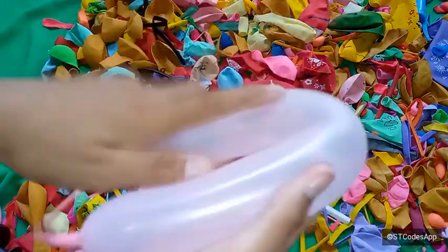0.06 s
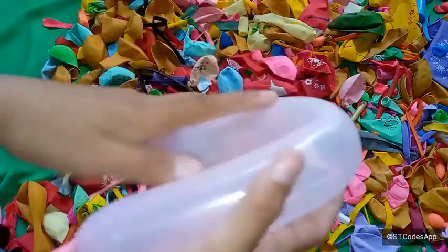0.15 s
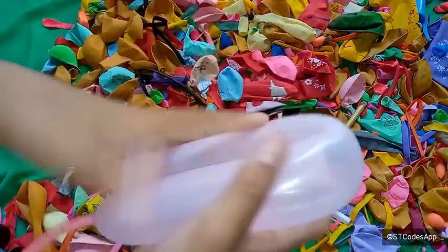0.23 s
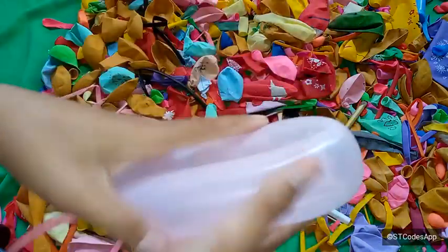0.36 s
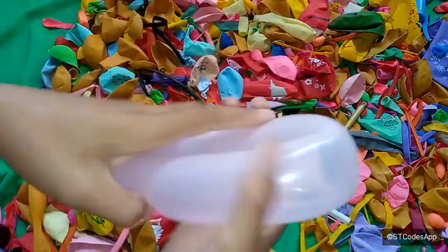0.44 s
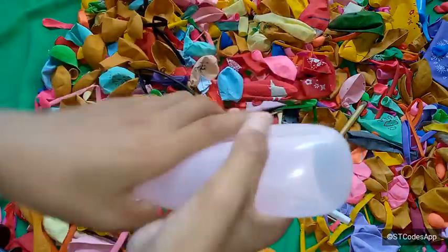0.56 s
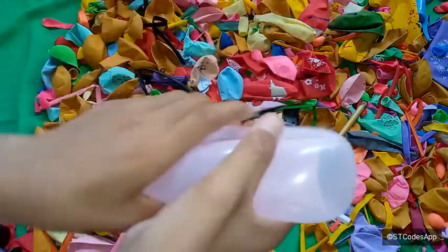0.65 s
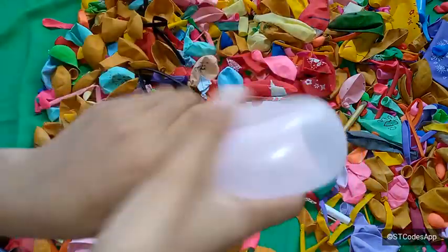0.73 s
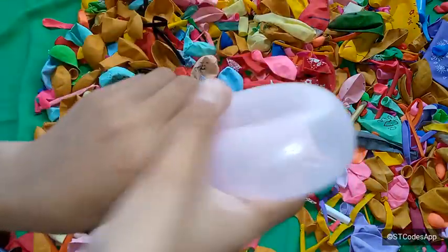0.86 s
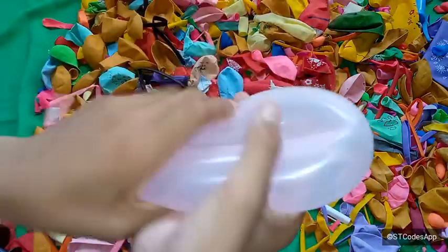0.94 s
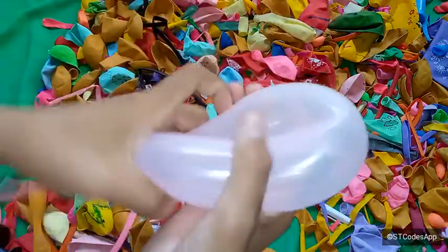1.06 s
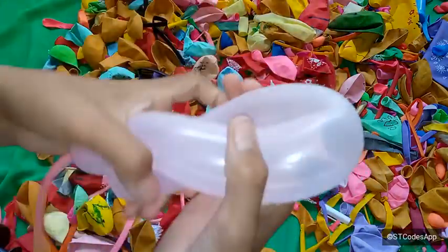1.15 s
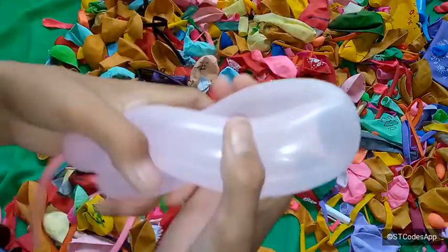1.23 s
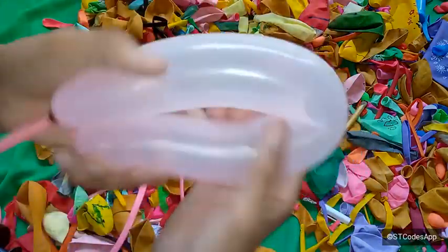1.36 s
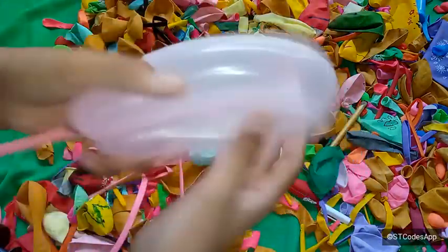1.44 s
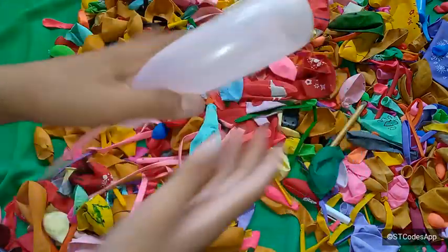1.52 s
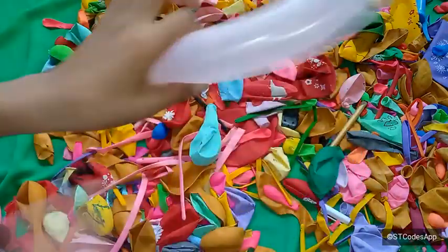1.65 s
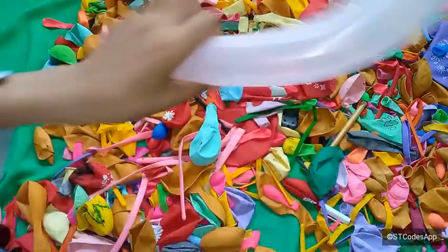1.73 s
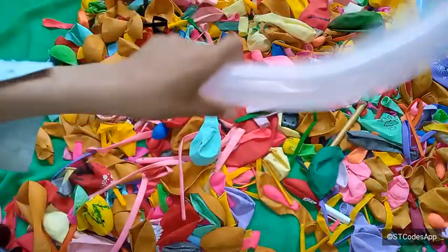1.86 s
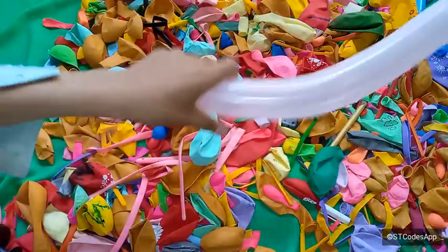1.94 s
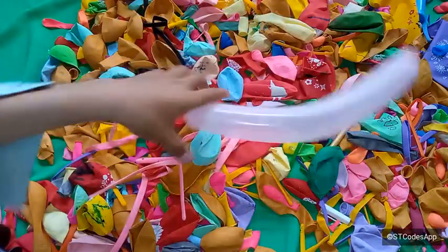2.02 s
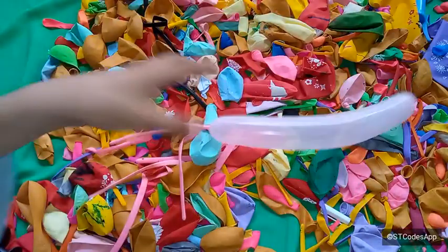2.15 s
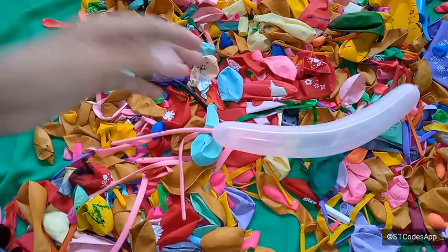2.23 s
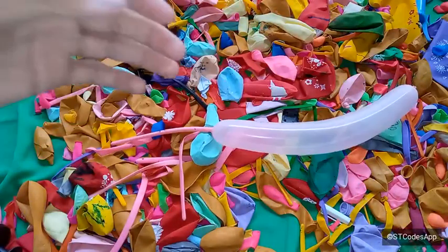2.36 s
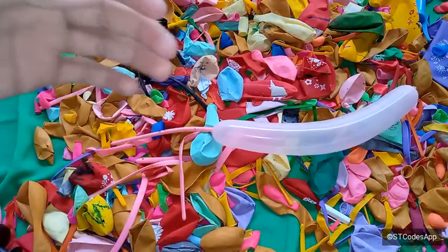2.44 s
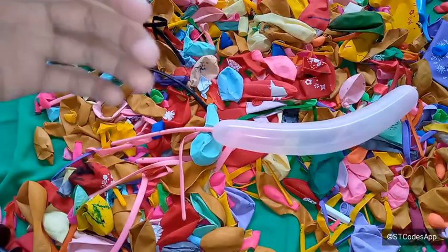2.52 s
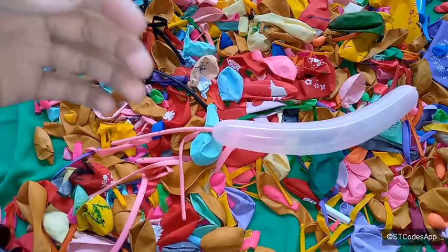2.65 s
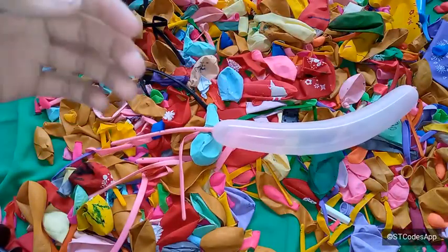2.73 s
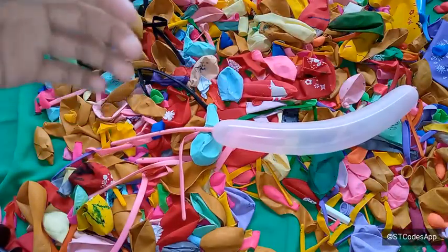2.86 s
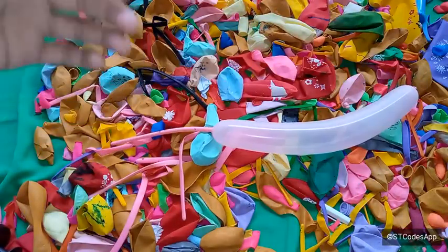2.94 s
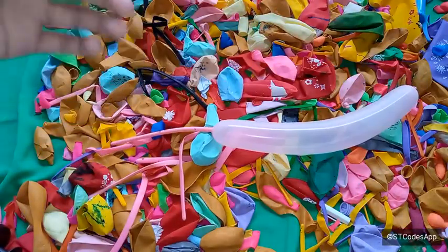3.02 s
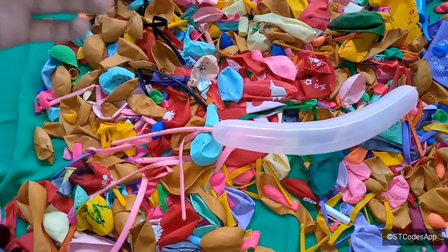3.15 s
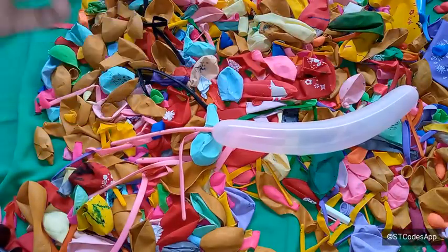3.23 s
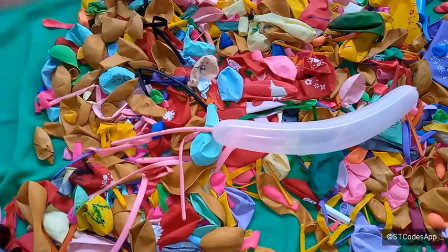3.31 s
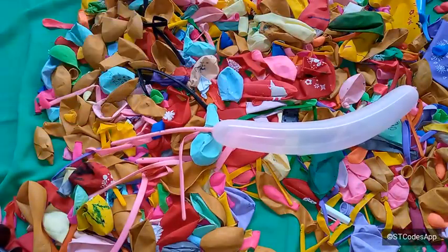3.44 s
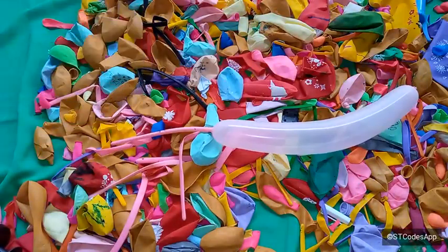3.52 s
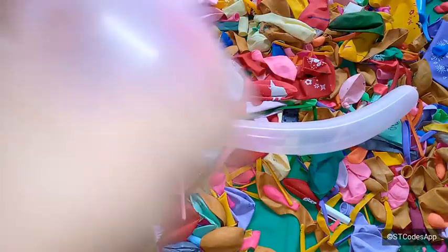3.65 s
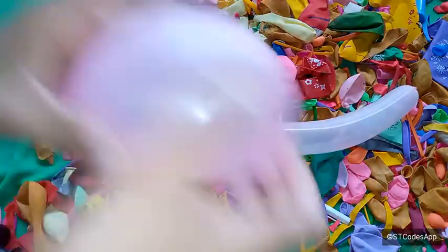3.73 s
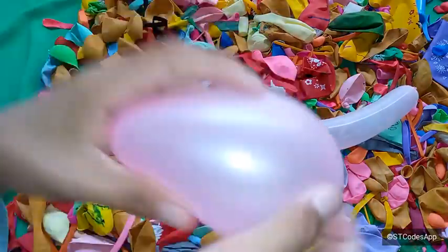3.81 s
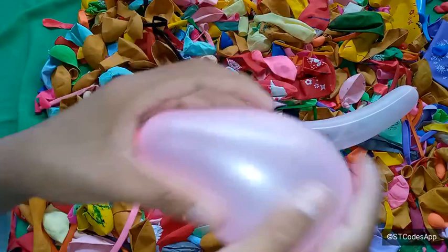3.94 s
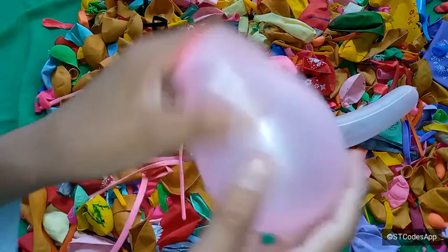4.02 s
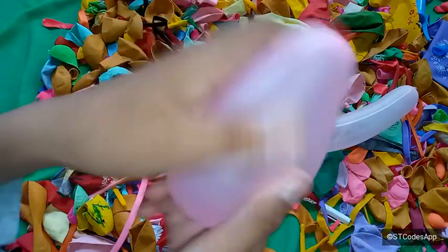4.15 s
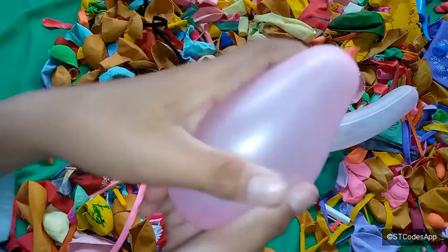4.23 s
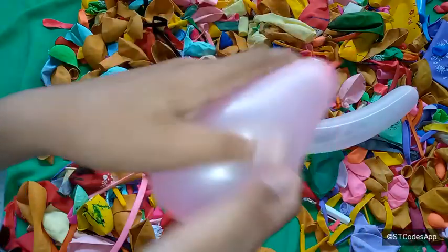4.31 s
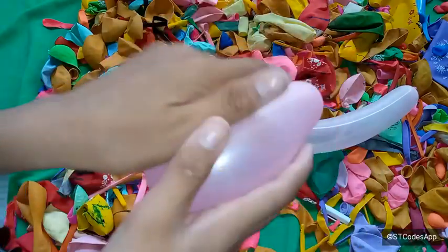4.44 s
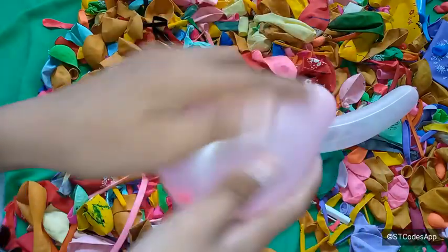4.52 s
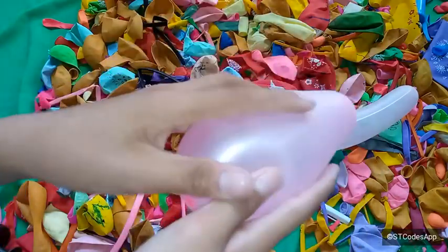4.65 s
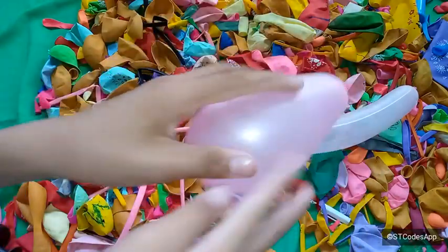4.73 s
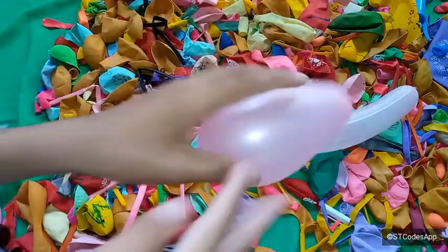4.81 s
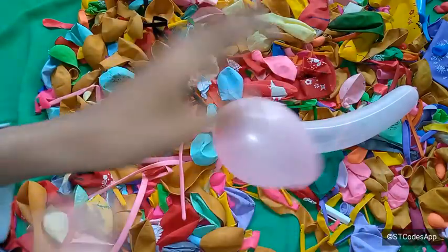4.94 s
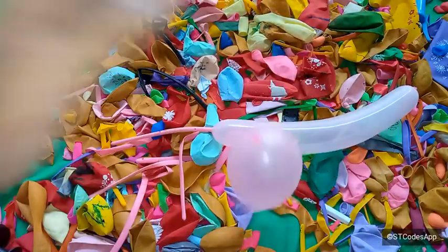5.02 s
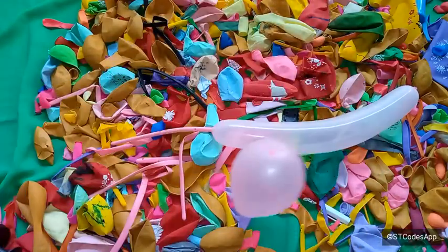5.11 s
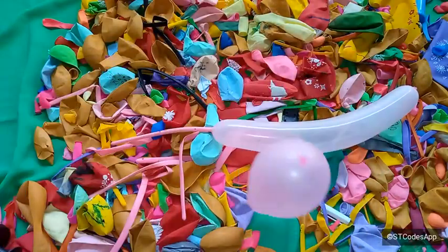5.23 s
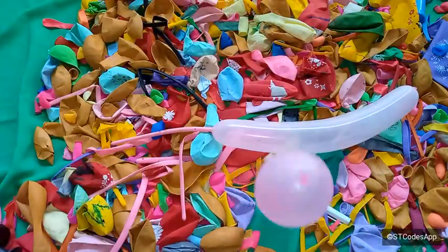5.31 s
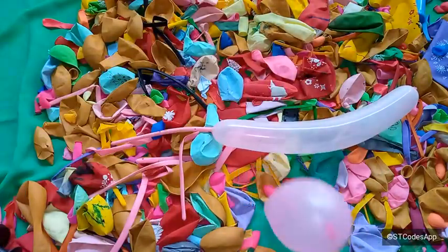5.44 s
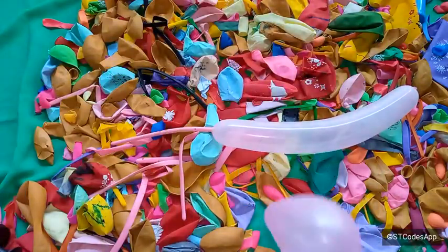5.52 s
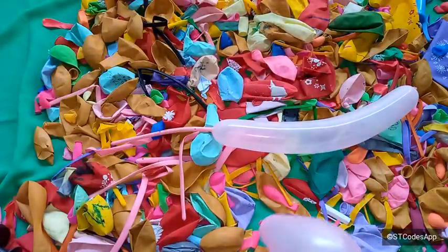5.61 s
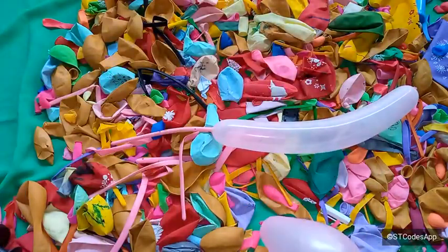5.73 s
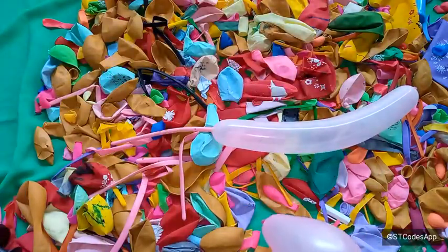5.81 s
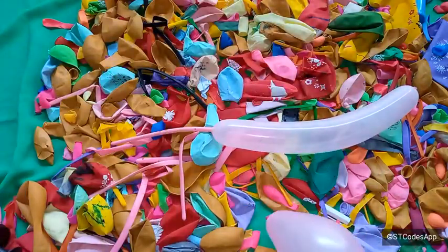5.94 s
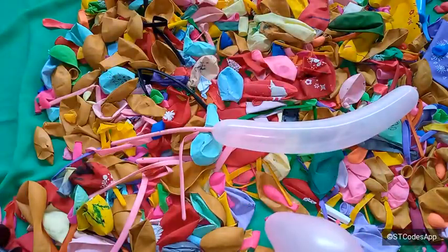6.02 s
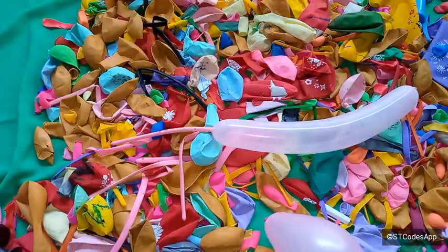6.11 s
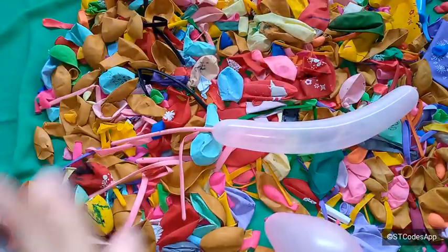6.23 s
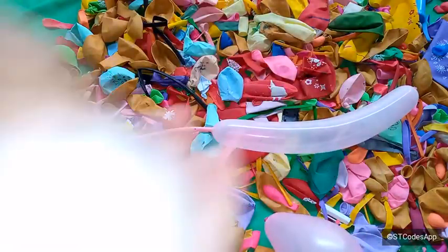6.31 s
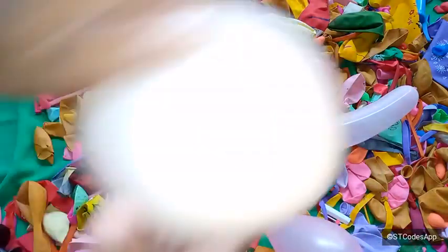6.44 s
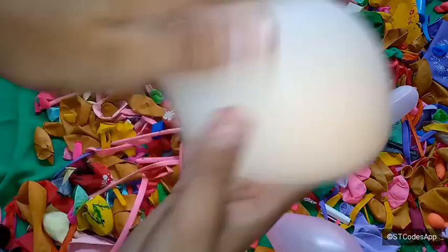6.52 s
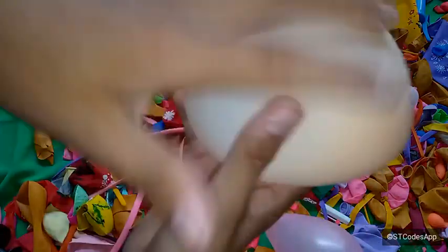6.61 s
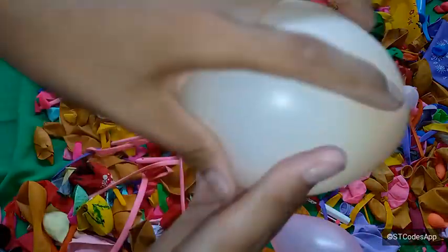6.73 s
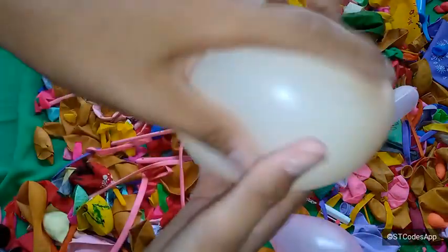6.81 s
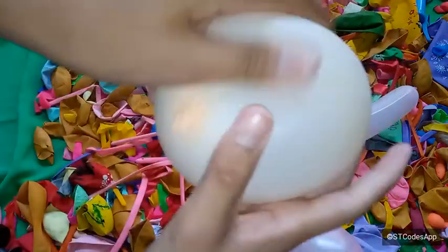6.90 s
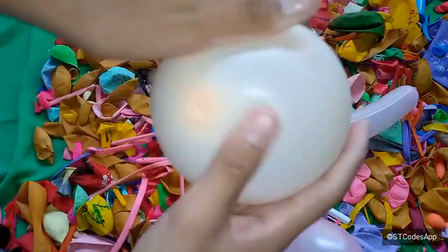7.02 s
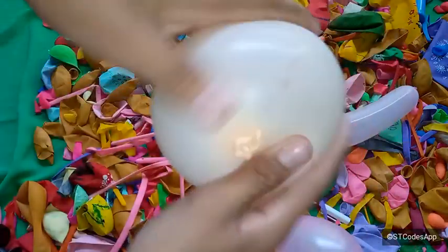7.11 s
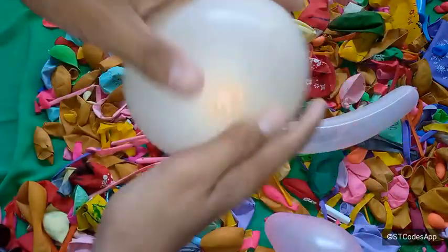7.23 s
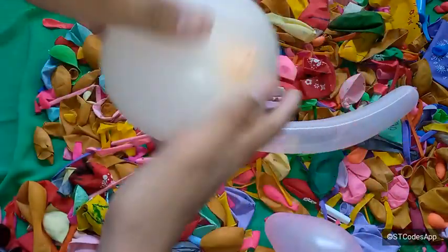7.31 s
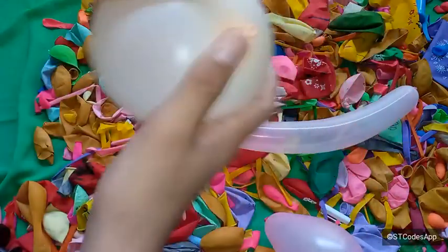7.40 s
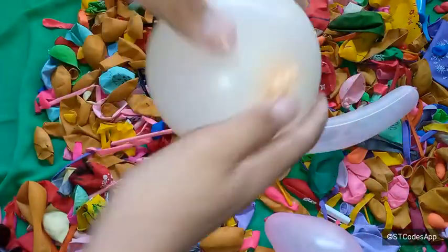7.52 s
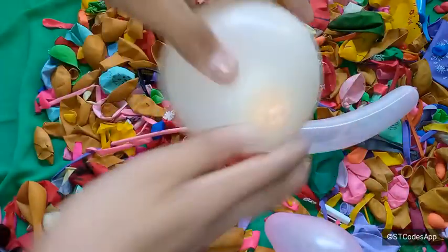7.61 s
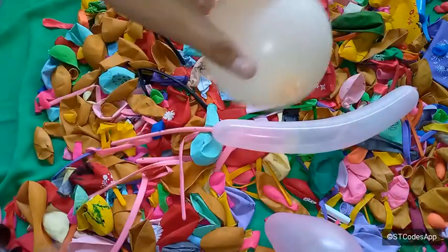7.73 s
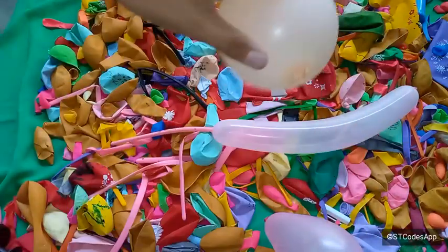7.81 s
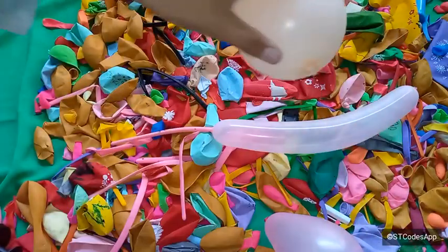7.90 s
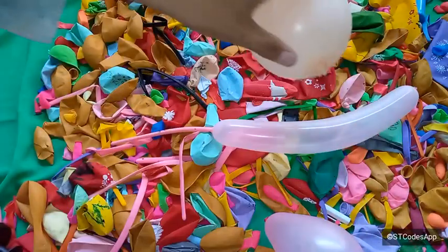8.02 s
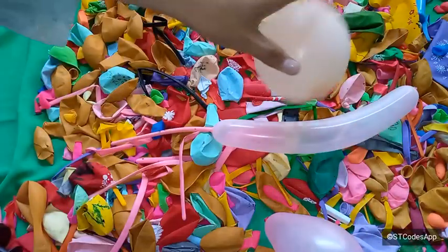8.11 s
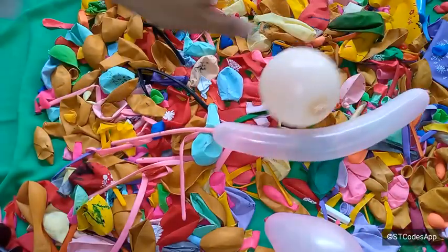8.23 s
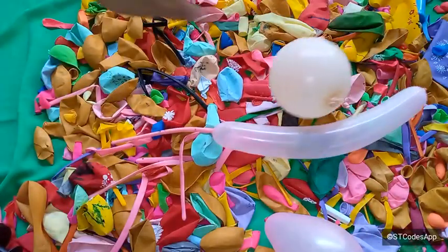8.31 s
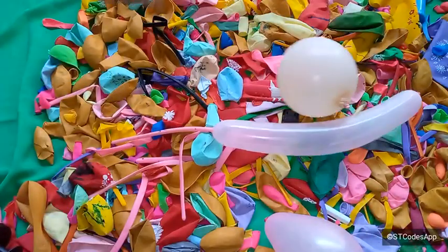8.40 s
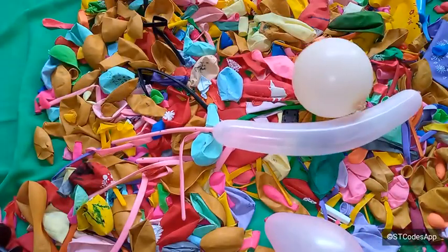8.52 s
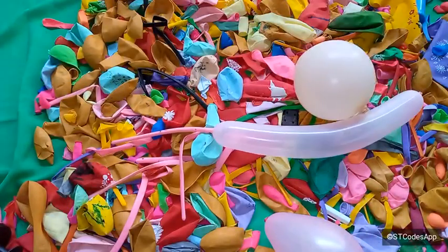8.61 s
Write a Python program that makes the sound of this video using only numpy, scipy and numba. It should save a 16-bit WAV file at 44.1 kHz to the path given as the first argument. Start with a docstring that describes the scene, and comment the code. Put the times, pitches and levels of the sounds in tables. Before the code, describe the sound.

Close to a phone microphone in a quiet room, hands briskly rub a latex balloon, giving bright crackly rustle, quick squeaks, sharp little snaps and a hollow thump. After a quiet gap, a second balloon creaks and squeaks more softly. Another pause, then a rounder balloon gives deeper, duller rubbing, low groaning squeaks and drumming, ending with a soft knock. A faint low hum and hush stay underneath.

```python
"""Quiet room, a phone microphone close by: hands rub and squeeze three latex balloons in turn.
Rubbing is a spray of random slips ringing through skin resonances; squeaks are gliding overtone stacks.
Skin snaps free as noise cracks that ring the skin modes; whole balloons knock as decaying low sines.
Faint stirs are band-passed noise bursts, and filtered noise makes the room hush and a wavering hum."""
import sys
import numpy as np
from scipy import signal
from scipy.fft import rfft, irfft, next_fast_len
from scipy.io import wavfile
from scipy.ndimage import uniform_filter1d
from numba import njit

SR = 44100
rng = np.random.default_rng(int(sys.argv[2]) if len(sys.argv) > 2 else 0)


def materialize(psi):
    """Save the field psi as 16-bit PCM at rate SR to the path in sys.argv[1].

    A 1-D psi becomes a single channel; in a 2-D psi each row is a channel.
    """
    bounded = np.clip(np.atleast_2d(psi).T, -1, 1)
    quanta = np.round(bounded * 32767).astype(np.int16)
    wavfile.write(sys.argv[1], SR, quanta)


N = 381906

# All levels are as mixed close to the balloons, ahead of the microphone response; many are relative.
# Room hush spectrum: pitch_hz, relative level_db
HUSH_SPECTRUM = [(15, -62.5), (25, -21), (69, -19.5), (100, -2.5), (157, -16.5), (204, -8.5), (229, -17.5),
                 (334, -14.5), (966, -25), (1060, -24), (1480, -28), (4370, -33.5), (7000, -36.5),
                 (9000, -30), (15000, -31.5)]
# Level of the hush's treble over time: time_s, level_db
HUSH_TREBLE = [(1.8, 3.5), (3.5, -0.6), (4.9, -1.2), (6.0, -3), (8.6, -1.5)]
# Strokes of skin over rubber: peak_s, swell_s (per 20 dB), fade_s (per 20 dB), rustle level_db,
# creak_db (relative to the rustle), bright_db (relative to the rustle)
STROKES = [(0.058, 0.076, 0.05, -33.0, -17.5, 0), (0.092, 0.012, 0.008, -34.0, 4.5, 0),
           (0.12, 0.02, 0.062, -36.5, 2.5, 0), (0.22, 0.023, 0.075, -35.5, -8.5, 1),
           (0.351, 0.008, 0.035, -66.5, 27.0, 0), (0.42, 0.037, 0.101, -43.0, -1.0, 1),
           (0.521, 0.042, 0.125, -44.5, -6.5, 2), (0.622, 0.03, 0.136, -43.5, -8.0, 0),
           (0.704, 0.047, 0.145, -42.5, -36.5, 0), (0.79, 0.041, 0.045, -28.0, -8.5, 1),
           (0.839, 0.014, 0.038, -35.5, -2.0, 0), (0.929, 0.015, 0.478, -43.5, -4.0, 0),
           (1.098, 0.181, 0.052, -38.0, 4.5, 0), (1.188, 0.057, 0.129, -42.0, 3.0, 3),
           (1.325, 0.05, 0.07, -30, 0, 6), (1.457, 0.053, 0.05, -37.0, -5.5, 5),
           (1.516, 0.01, 0.04, -32.0, 4, 1), (1.587, 0.074, 0.064, -37.0, -1.5, 3),
           (1.639, 0.02, 0.063, -41.0, 3.0, 1), (3.568, 0.024, 0.254, -62.0, -2.5, 0),
           (3.673, 0.01, 0.24, -60.0, 10.5, 0), (3.808, 0.101, 0.061, -44.0, 11, 0),
           (3.917, 0.015, 0.115, -35.5, 4.5, 0), (4.018, 0.05, 0.088, -39.0, 6.0, 0),
           (4.127, 0.153, 0.353, -41.0, 0.5, 0), (4.297, 0.071, 0.109, -40.0, 5.5, 0),
           (4.383, 0.04, 0.079, -35.5, 1.5, 0), (4.472, 0.135, 0.061, -34.5, 3.5, 0),
           (4.535, 0.051, 0.056, -34.0, 4.5, 0), (4.718, 0.17, 0.05, -32.5, 4.0, -1),
           (4.814, 0.042, 0.045, -43.5, 4.0, -2), (6.004, 0.022, 0.156, -63.5, 19.0, -3),
           (6.132, 0.03, 0.074, -57.5, 15.5, -2), (6.323, 0.01, 0.6, -63.5, 20.5, 0),
           (6.464, 0.087, 0.061, -42.5, 10.0, 0), (6.535, 0.053, 0.13, -37, 8, 0),
           (6.646, 0.02, 0.121, -47.5, 10.0, -2), (6.721, 0.032, 0.08, -46.0, 14.5, -2),
           (6.83, 0.05, 0.06, -42.5, 4.0, -2), (6.865, 0.069, 0.056, -43.5, 11.5, -2),
           (6.975, 0.111, 0.11, -32.5, 8.5, -2), (7.069, 0.095, 0.084, -37.0, 4.0, -2),
           (7.109, 0.017, 0.15, -43.0, 11.0, -2), (7.368, 0.03, 0.075, -34.5, 10.0, -2),
           (7.535, 0.075, 0.066, -39.5, 4.5, -3), (7.589, 0.097, 0.062, -47.5, 11.5, -2),
           (7.657, 0.015, 0.032, -56.5, -32.0, 0)]
# Palm squeezes that drum the skin: peak_s, swell_s (per 20 dB), fade_s (per 20 dB), level_db
SQUEEZES = [(0.095, 0.048, 0.064, -28.5), (0.229, 0.105, 0.107, -48.5), (0.355, 0.008, 0.021, -44.5),
            (0.453, 0.119, 0.036, -58.5), (0.607, 0.118, 0.088, -53.0), (0.855, 0.086, 0.03, -43.0),
            (0.938, 0.008, 0.167, -46.0), (1.103, 0.135, 0.027, -38.0), (1.191, 0.03, 0.051, -45.5),
            (1.314, 0.02, 0.121, -24.0), (1.511, 0.016, 0.121, -36.5), (1.657, 0.027, 0.072, -38.0),
            (2.84, 0.028, 0.088, -46.5), (3.801, 0.172, 0.076, -48.0), (4.037, 0.11, 0.072, -38.0),
            (4.214, 0.381, 0.055, -54.0), (4.298, 0.037, 0.076, -37.0), (4.483, 0.239, 0.029, -40.0),
            (4.528, 0.029, 0.056, -35.5), (4.702, 0.043, 0.074, -26.5), (6.0, 0.018, 0.115, -40.0),
            (6.152, 0.043, 0.053, -43.0), (6.323, 0.01, 0.16, -39.5), (6.453, 0.078, 0.093, -28.0),
            (6.505, 0.021, 0.303, -38.5), (6.704, 0.022, 0.051, -37.0), (6.853, 0.142, 0.046, -36.5),
            (7.012, 0.127, 0.175, -25.0), (7.325, 0.031, 0.088, -24.0), (7.601, 0.087, 0.098, -23.0)]
# Slow shoves of a whole balloon: peak_s, swell_s (per 20 dB), fade_s (per 20 dB), level_db
SHOVES = [(0.097, 0.076, 0.257, -62.0), (0.821, 0.164, 0.273, -54.5), (1.112, 0.055, 0.046, -54.0),
          (1.348, 0.027, 0.05, -28.0), (1.586, 0.106, 0.062, -39.0), (1.662, 0.027, 0.1, -36.0),
          (2.847, 0.049, 0.033, -47.0), (4.043, 0.017, 0.065, -50.0), (4.398, 0.044, 0.058, -56.0),
          (6.33, 0.012, 0.15, -43.5), (6.475, 0.129, 0.063, -35.0), (6.6, 0.054, 0.171, -47.0),
          (6.963, 0.028, 0.133, -40.0), (7.12, 0.026, 0.074, -51.5), (7.368, 0.086, 0.129, -40.0),
          (7.575, 0.108, 0.189, -57.0), (7.665, 0.011, 0.045, -34.5)]
# Each balloon in turn: start_s, sheen_db (top treble of its rustle), creak_pitch (ratio; rounder is lower)
BALLOONS = [(0, -3.5, 1.06), (2.5, -1, 0.95), (5.5, -11.5, 0.84)]
# Rustle resonances of the latex: pitch_hz, width_hz, relative level_db
LATEX_MODES = [(2226, 1100, 2.5), (3670, 1100, 4.5), (4650, 760, 2.5)]
# Wandering skin modes that creak: pitch_hz, width_hz, relative level_db
CREAK_MODES = [(775, 190, 0.5), (1087, 310, 1.5), (1550, 360, 0.5)]
# Low skin modes that drum: pitch_hz, width_hz (of one filter pass), relative level_db
DRUM_MODES = [(299, 100, 1.5), (417, 160, -0.5), (570, 130, -9)]
# Top resonances of the rustle: pitch_hz, width_hz, relative level_db
GLOSS_MODES = [(6790, 4700, 0), (13600, 9000, 4.5)]
# Gliding tones: stick-slip squeaks, and two very short low thuds (at 0.067 and 4.036 s):
# start_s, end_s, start_hz, end_hz, level_db (before wobble), tilt_db (per octave of overtone)
TONES = [(0.067, 0.07, 312, 259, -30, -22), (0.089, 0.103, 291, 300, -35.5, -20),
         (0.421, 0.429, 1524, 1395, -38, -1.5), (0.575, 0.611, 471, 370, -51, -26),
         (0.616, 0.659, 3460, 3180, -35.5, -13), (0.645, 0.7, 2275, 2090, -41, -15),
         (0.657, 0.704, 2796, 2538, -27, -15), (0.7, 0.736, 2620, 2950, -32, -9),
         (0.768, 0.816, 1045, 848, -34, -18), (0.833, 0.867, 315, 300, -41, -18),
         (1.244, 1.264, 715, 790, -42, -13), (1.29, 1.349, 425.5, 460, -25, -7),
         (1.449, 1.471, 1049, 1017, -34, -4), (1.516, 1.525, 1246, 1420, -24, -10),
         (1.55, 1.598, 160, 153, -33, -16), (2.875, 2.93, 335, 320, -62, -25),
         (2.915, 2.975, 2950, 2880, -72, -20), (3.919, 3.967, 2780, 2790, -38, -15),
         (3.985, 4.026, 560, 526, -39.5, -2.5), (3.999, 4.061, 999, 945, -30.5, -11),
         (4.036, 4.04, 312, 250, -25.5, -18), (4.256, 4.286, 2100, 1600, -39, -15),
         (4.265, 4.334, 1067, 975, -34, -8), (4.382, 4.412, 1020, 960, -36, -10),
         (4.43, 4.469, 842, 798, -28, -5), (4.463, 4.48, 687, 638, -26.5, -16),
         (4.477, 4.5, 2250, 1200, -34, -15), (4.519, 4.542, 580, 552, -32, -9),
         (4.637, 4.658, 1227, 1440, -33, -9), (4.675, 4.728, 365, 324, -28, -8),
         (4.7, 4.728, 1576, 1613, -31, -19), (5.982, 6.045, 433.4, 439, -38.5, -9),
         (6.042, 6.104, 580, 572, -44, -30), (6.119, 6.179, 428, 419, -39.5, -11),
         (6.125, 6.2, 590, 580, -45, -25), (6.262, 6.305, 590, 590, -56, -25),
         (6.446, 6.479, 238.8, 193, -31, -8.5), (6.502, 6.537, 416, 574, -33, -6),
         (6.52, 6.548, 1190, 1210, -32.5, -6), (6.552, 6.595, 1554, 2160, -39, -19),
         (6.7, 6.751, 478, 450, -37.5, -2.5), (6.822, 6.863, 478, 494, -37, -6),
         (6.852, 6.892, 641, 630, -33, -14), (6.942, 6.968, 381, 331, -26, -4),
         (6.951, 6.989, 1370, 1350, -26, -18), (6.975, 7.033, 169.6, 328.5, -21.5, -5.5),
         (7.038, 7.093, 329, 445, -25, -7), (7.099, 7.135, 752, 680, -31.5, -6.5),
         (7.3, 7.357, 350, 337, -26, -11.5), (7.335, 7.352, 1150, 1400, -37, -8),
         (7.361, 7.384, 860, 800, -27, -2), (7.39, 7.44, 1450, 1550, -40, -15),
         (7.51, 7.555, 1650, 1580, -41, -15), (7.558, 7.656, 365, 278.6, -21.5, -18.5),
         (7.702, 7.781, 302, 324, -44.5, -26.5), (8.232, 8.243, 4220, 4180, -54, -20),
         (8.261, 8.268, 3900, 3750, -57, -20)]
# Skin snapping free: start_s, crack level_db, body_db (relative to the crack)
SNAPS = [(0.0897, -18, 3), (0.1207, -12.5, -6), (0.2166, -20.5, -5), (0.3512, -28, 6.5),
         (0.8378, -20.5, -30), (0.8416, -13.5, -10), (0.8471, -22, -9), (0.9337, -23, -2),
         (1.0267, -17.5, -16), (1.078, -15, -14), (1.1006, -12, -6), (1.1811, -19, -5), (1.1965, -19, -5),
         (1.2194, -20, -5), (1.492, -21, -21), (1.5024, -18.5, -12), (1.5825, -13.5, -15),
         (1.6399, -19, -33), (3.675, -46, 14), (6.322, -52, 24), (6.4398, -32, -1), (6.6457, -41, 14.5),
         (6.9867, -21, -6.5), (7.0051, -13, -9), (7.3608, -20, 5.5), (7.3838, -28, 9)]
# Soft knocks of a whole balloon: start_s, level_db (before swell and fade), pitch_hz, t60_s
KNOCKS = [(1.333, -14.5, 301, 0.084), (1.648, -31.5, 182, 0.15), (2.832, -39, 131, 0.092),
          (7.661, -19, 112, 0.091)]
# Faint stirrings: start_s, level_db (before the band-pass), centre_hz
STIRS = [(1.805, -50, 1935), (1.94, -50, 3850), (2.1474, -54, 4250), (2.174, -59, 4260), (2.813, -56, 2000),
         (2.843, -53, 2800), (2.978, -58, 1300), (3.112, -58, 2600), (3.135, -57, 5200), (3.463, -51, 5440),
         (5.7059, -56, 2200), (8.232, -52, 4174), (8.2615, -53, 3200)]
# Microphone response: pitch_hz, level_db
MIC_RESPONSE = [(25, -16), (70, -1), (6000, 0), (7000, -6.5), (8000, -21), (10000, -23), (13500, -26),
                (15200, -13)]

HUSH_DB = -66.5  # rms before its treble breathes
HUM_HZ, HUM_WIDTH_HZ, HUM_DB = 100, 12., -74.5
PATCH_HZ, PATCH_WIDTH, PATCH_TILT_DB = (750, 5200), .07, 0.9  # pitch range, share of pitch, dB per octave
TILT_HZ = 3000  # above this a stroke's rustle is called bright
SOFT_HZ = 1790  # the soft contact weakens overtones around and above this
CHOP_BELOW_HZ, PUFF_CYCLES = 700, .3  # a puff fades by 1 / e in this share of a cycle
LOCK_BELOW_HZ = 520  # tones starting lower than this quieten the drumming
STIR_CYCLES, STIR_ATTACK_S = 450, .0025  # cycles of the centre pitch to fade by 60 dB; attack constant
TOP_HZ = 15830  # edge of the steep top cut


def undb(db):
    """Gain of a level in dB."""
    return np.exp(np.asarray(db) * np.log(10) / 20)


def level(x, db):
    """Scale to an rms level in dB."""
    return x * undb(db) / np.sqrt(np.mean(x ** 2))


@njit
def svf(x, hz, width):
    """State-variable band-pass whose centre may move every sample."""
    y, band, low = np.empty(len(x)), 0., 0.
    for i in range(len(x)):
        g, k = np.tan(np.pi * hz[i] / SR), width / hz[i]
        v = (band + g * (x[i] - low)) / (1 + g * (g + k))
        band, low, y[i] = 2 * v - band, low + 2 * g * v, k * v
    return y


def walk(rate, n=N):
    """Random levels held 1 / rate s and slewed; spread near 1."""
    hold = int(SR / rate)
    steps = np.repeat(rng.standard_normal(n // hold + 1), hold)
    return 1.27 * uniform_filter1d(steps, hold)[:n]


def colour(x, points):
    """Filter by (Hz, dB) points joined on a log pitch scale."""
    m = next_fast_len(len(x))
    hz, db = np.transpose(points)
    bins_hz = np.arange(m // 2 + 1) * SR / m
    gain = undb(np.interp(np.log(bins_hz + 1), np.log(hz), db))
    return irfft(rfft(x, m) * gain, m)[:len(x)]


def add(out, s, sound):
    """Mix a sound in at a time in seconds."""
    i = int(s * SR)
    out[i:i + len(sound)] += sound[:len(out) - i]


def room():
    """Noise hush whose treble breathes a little, under a hum of narrow noise that wavers by itself."""
    hush = level(colour(rng.standard_normal(N), HUSH_SPECTRUM), HUSH_DB)
    treble = svf(hush, np.full(N, 3000.), 6000.)
    treble_db = np.interp(np.arange(N) / SR, *np.transpose(HUSH_TREBLE))
    treble_db = treble_db + 1.2 * walk(1.7) + 1.5 * walk(9)
    hush = hush + (undb(treble_db) - 1) * treble
    centre = np.full(N, 1. * HUM_HZ)
    hum = svf(rng.standard_normal(N), centre, HUM_WIDTH_HZ)
    hum = svf(hum, centre, 2 * HUM_WIDTH_HZ)
    return hush + level(hum, HUM_DB)


def strokes(rows):
    """Each stroke swells to its peak and fades at a steady dB rate; overlapping strokes add in power."""
    peak_s, swell_s, fade_s, db = np.transpose(rows)[:, :, None]
    t = np.arange(0, N, 32) / SR
    drop = np.where(t < peak_s, (peak_s - t) / swell_s, (t - peak_s) / fade_s)
    power = undb(db - 20 * drop) ** 2
    return np.interp(np.arange(N) / SR, t, np.sqrt(power.sum(axis=0)))


def slips(per_s, scatter_db):
    """Tiny random slips, a few far stronger than the rest."""
    sizes = undb(scatter_db * rng.exponential(size=N)) * rng.standard_normal(N)
    return sizes * (rng.random(N) < per_s / SR) + 1e-12


def ring(x, modes, drift, order=1, pitch=1):
    """Modes that shift as fingers stretch the skin; neighbours swing in opposite sense."""
    out = 0
    for k, (hz, width, db) in enumerate(modes):
        centre = pitch * hz * np.exp(drift * walk(18))
        y = x
        for _ in range(order):
            y = svf(y, centre, 1. * width)
        out = out + (-1) ** k * undb(db) / np.sqrt(width) * y
    return out


def patches(x, count=9):
    """Small taut patches between the fingers sing briefly, each at a pitch that jumps as the grip shifts."""
    out = 0
    for hz in np.geomspace(*PATCH_HZ, count):
        hop = np.cumsum(rng.random(N) < 35 / SR)  # about 35 grip shifts a second
        jump = .15 * rng.uniform(-1, 1, N // 100)[hop]
        centre = hz * np.exp(jump + 0.0099 * walk(40))
        drive = x * undb(4 * np.clip(rng.standard_normal(N // 100), -2, 1.3))[hop]
        sung = svf(drive, centre, PATCH_WIDTH * hz)
        sung = svf(sung, centre, 2 * PATCH_WIDTH * hz)
        out = out + level(sung, PATCH_TILT_DB * np.log2(hz / PATCH_HZ[0]))
    return out


def locked(duck_db):
    """During each low squeak or short low thud, the skin's random drumming subsides."""
    gain = np.ones(N)
    for start_s, end_s, start_hz, *_ in TONES:
        if start_hz < LOCK_BELOW_HZ:
            gain[int(start_s * SR):int(end_s * SR)] = undb(duck_db)
    return uniform_filter1d(gain, int(0.011 * SR))


def rub(chop):
    """Sprays of slips, coming in shared flurries, sound in every part of the skin."""
    slide = strokes([row[:-2] for row in STROKES])
    bright = strokes([(s, swell, fade, db + bright_db)
                      for s, swell, fade, db, _, bright_db in STROKES])
    stretch = strokes([(s, swell, fade, db + creak_db)
                       for s, swell, fade, db, creak_db, _ in STROKES])
    press, shove = strokes(SQUEEZES), strokes(SHOVES)

    flurry = undb(0.9 * walk(45) + 1.5 * walk(150))
    fine = flurry * slips(9000, scatter_db=1.62)
    coarse = flurry * slips(3000, scatter_db=1.37)
    # lone sharper slips that come in clusters
    crackle = slips(500, scatter_db=2.0) * undb(2.5 * walk(25))
    fine = level(fine, 0) + level(crackle, -8)
    coarse = level(coarse, 0) + level(crackle, -8.5)

    starts, sheen_db, pitch = np.transpose(BALLOONS)
    held = np.searchsorted(starts, np.arange(N) / SR, side="right") - 1  # the balloon in hand
    sheen = level(ring(slips(12160, scatter_db=1.8) * flurry, GLOSS_MODES, 0.016), 4)
    sheen = undb(sheen_db[held]) * sheen
    rustle = level(ring(fine, LATEX_MODES, 0.07) * undb(0.7 * walk(30)), 1.5)
    rustle = rustle + level(patches(fine), -3)
    creak = ring(coarse, CREAK_MODES, 0.081, pitch=pitch[held])
    creak = level(creak * undb(0.8 * walk(30)), -1.8)
    drum = ring(coarse, DRUM_MODES, 0.08, order=3)
    drum = level(drum * undb(0.8 * walk(25)), 0.5) * locked(-7.5)
    thud = ring(coarse, [(108, 135, 0)], 0.12, order=3)  # one broad low mode
    thud = level(thud * undb(0.8 * walk(13)), 1.5)

    dull = signal.lfilter(*signal.butter(2, TILT_HZ, fs=SR), rustle)
    rubbing = chop * (slide * dull + bright * (rustle - dull + sheen))
    return rubbing + stretch * creak + press * drum + shove * thud


def gliding_tones():
    """Gliding, unsteady overtones: stick-slip squeaks and two brief thuds; low ones chop the rustle in puffs."""
    out, chop = np.zeros(N), np.ones(N)
    for start_s, end_s, start_hz, end_hz, db, tilt_db in TONES:
        n = int((end_s - start_s + .012) * SR)  # 6 ms of fade beyond each end
        glide_hz = np.linspace(start_hz, end_hz, n) * (1 + .03 * walk(start_hz / 6, n))
        cycles = np.cumsum(glide_hz) / SR
        wobble_db = 3.0 * np.clip(walk(start_hz / 8, n), -3, 1)
        grip = undb(db + wobble_db) * np.hanning(n) ** 0.64
        lag = rng.random(9)  # each overtone flickers and lags on its own
        tone = 0
        for k in range(1, 9):
            if k * start_hz >= 7000:
                break
            flicker_db = 3.0 * (k > 1) * np.clip(walk(70, n), -3, 1)
            gain = undb(min(tilt_db, 0) * np.log2(k) + flicker_db)
            softness = 1 + ((k - 1) * start_hz / SOFT_HZ) ** 2
            tone = tone + gain / softness * np.cos(2 * np.pi * (k * cycles + .15 * lag[k]))
        add(out, start_s - .006, -grip * tone)
        if start_hz < CHOP_BELOW_HZ:
            puffs = level(np.exp(-(cycles % 1) / PUFF_CYCLES), 0)  # one per cycle
            add(chop, start_s - .006, np.hanning(n) ** .5 * (puffs - 1))
    return out, np.abs(chop)


def snaps():
    """A sharp release: a noise crack under a millisecond with a weak tail, then creak and drum modes ring."""
    crack, body = np.zeros(N), np.zeros(N)
    t = np.arange(int(.02 * SR)) / SR
    for s, db, body_db in SNAPS:
        burst = rng.standard_normal(len(t)) * (np.exp(-t / 0.0006) + .25 * np.exp(-t / 0.0059))
        add(crack, s, undb(db) * burst)
        add(body, s, undb(db + body_db) * np.exp(-t / 0.00016))
    crack = undb(-1.5) * svf(crack, np.full(N, 2600.), 5500.)
    return crack + undb(32) * ring(body, DRUM_MODES + CREAK_MODES, 0.035)


def knocks():
    """A whole balloon rings as one low sine that swells over a few milliseconds and dies away."""
    out, t = np.zeros(N), np.arange(int(.3 * SR)) / SR
    for s, db, hz, t60_s in KNOCKS:
        envelope = undb(db - 60 * t / t60_s) * (1 - np.exp(-t / .003))
        add(out, s, envelope * np.sin(2 * np.pi * hz * t))
    return out


def stirs():
    """Faint crackling bursts: flickering noise through a band-pass, fading faster at higher pitch."""
    out, t = np.zeros(N), np.arange(int(.3 * SR)) / SR
    for s, db, hz in STIRS:
        fade_db = 60 * t * hz / STIR_CYCLES
        envelope = undb(db - fade_db + 2.3 * walk(297, len(t))) * (1 - np.exp(-t / STIR_ATTACK_S))
        burst = envelope * rng.standard_normal(len(t))
        add(out, s, svf(burst, np.full(len(t), 1. * hz), 0.55 * hz))
    return out


def scene():
    """All sources; nearby surfaces add a short faint tail to the balloons."""
    tones, chop = gliding_tones()
    near = rub(chop) + tones + snaps() + knocks() + stirs()
    t = np.arange(int(.12 * SR)) / SR
    tail = rng.standard_normal(len(t)) * undb(-36 - 60 * t / 0.16)
    return (near + signal.fftconvolve(near, tail)[:N] + room())[None]


def record(dry):
    """The phone microphone loses deep bass and treble, partly recovers near 15 kHz, then cuts steeply."""
    heard = colour(dry[0], MIC_RESPONSE)[None]
    top_cut = signal.ellip(10, .2, 80, TOP_HZ, fs=SR, output="sos")
    return signal.sosfilt(top_cut, heard)


dry = scene()
out = record(dry)
materialize(out)
```